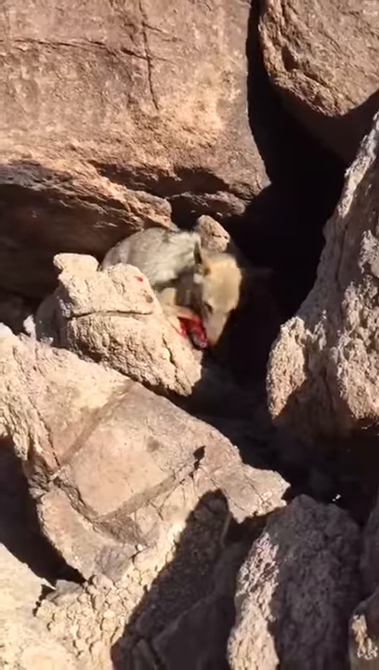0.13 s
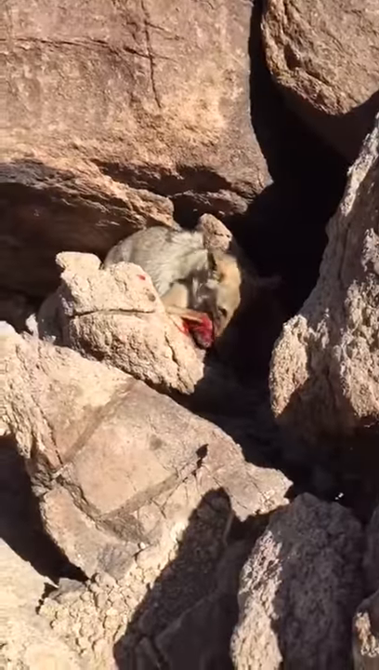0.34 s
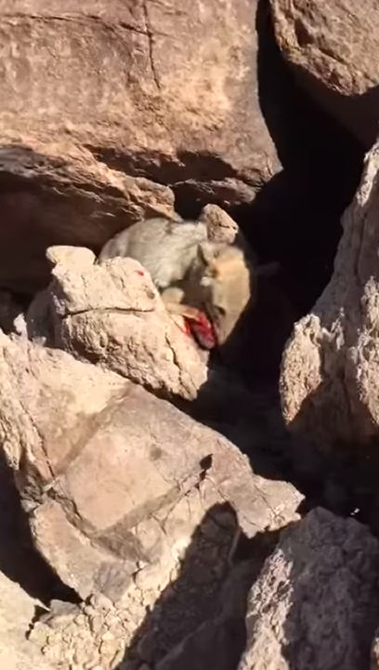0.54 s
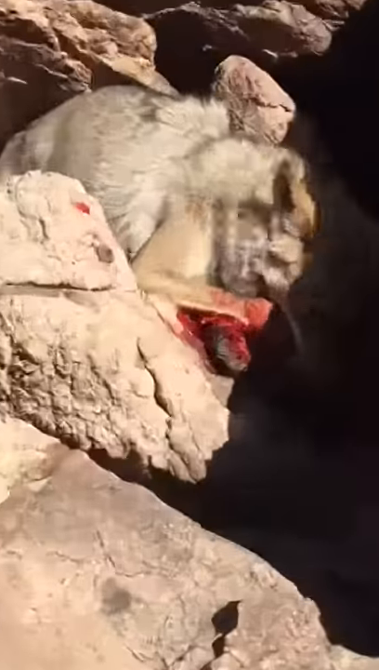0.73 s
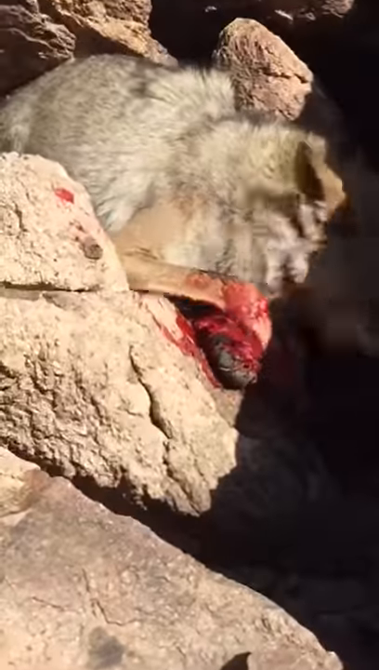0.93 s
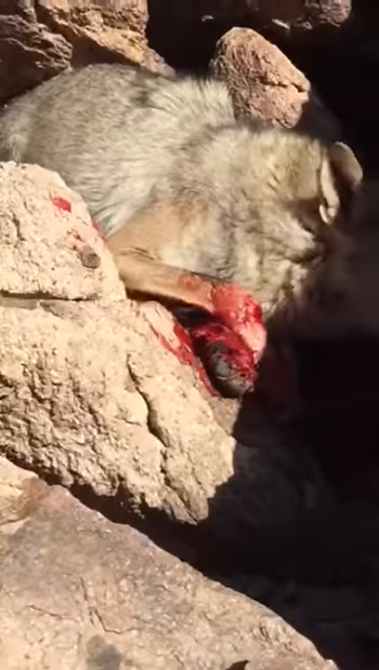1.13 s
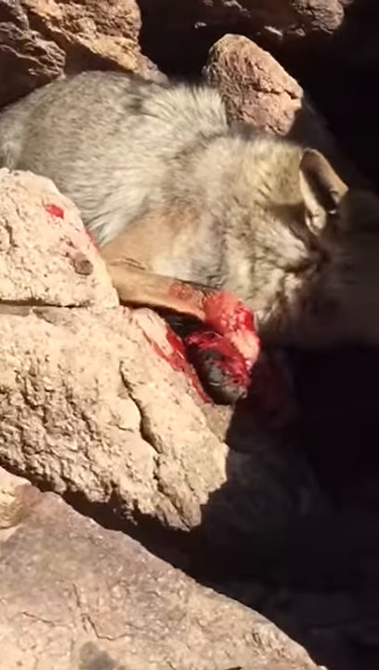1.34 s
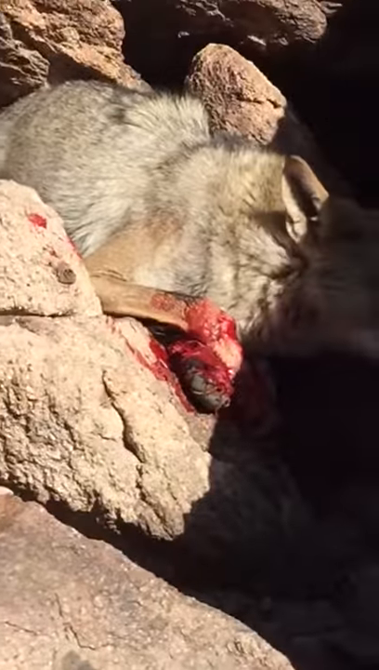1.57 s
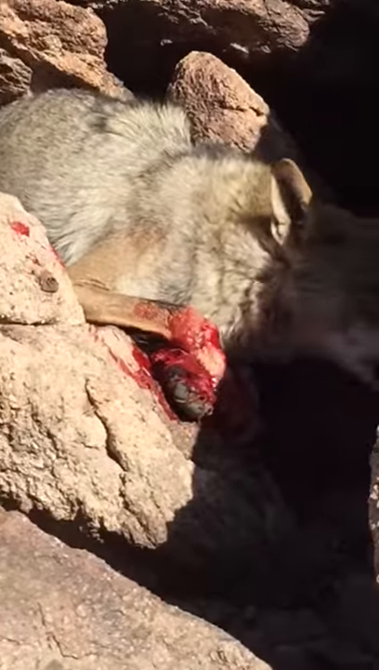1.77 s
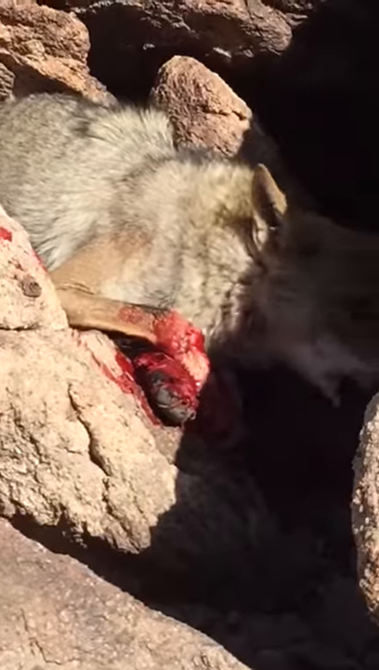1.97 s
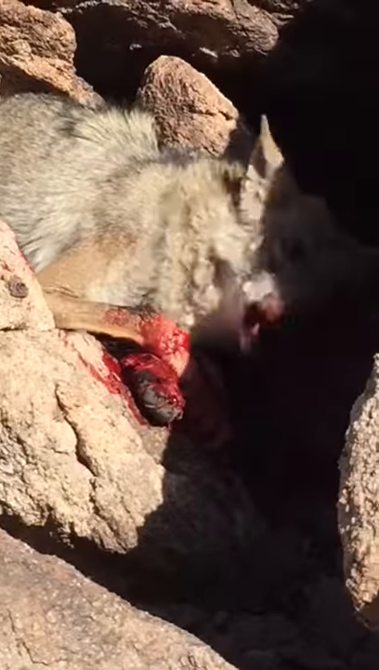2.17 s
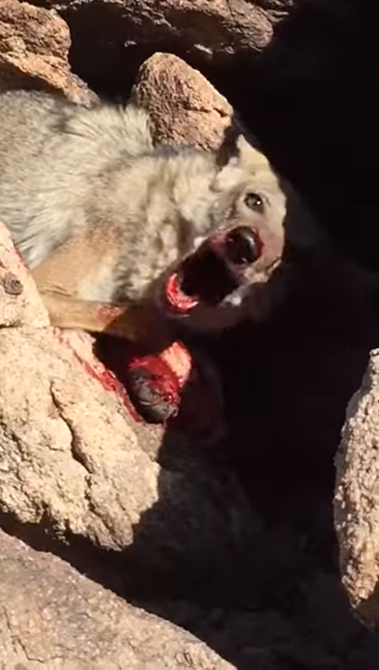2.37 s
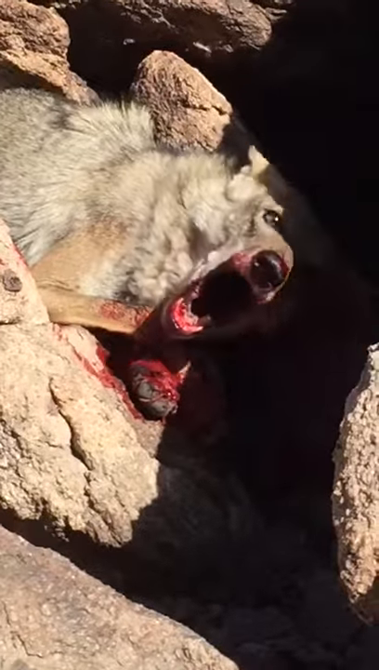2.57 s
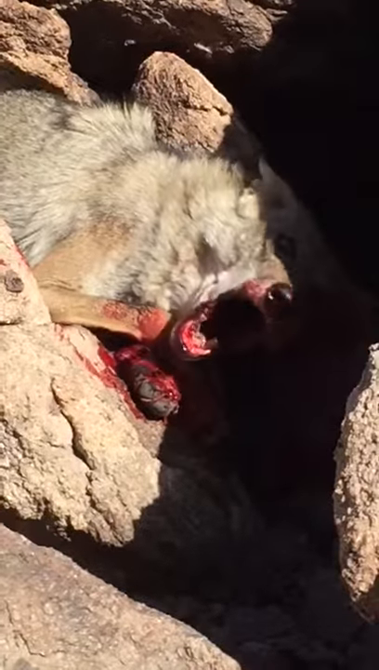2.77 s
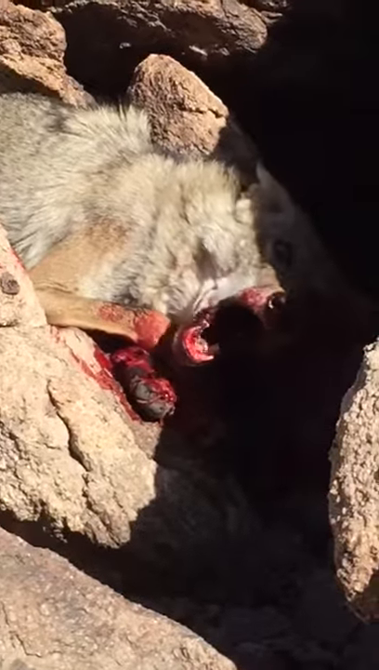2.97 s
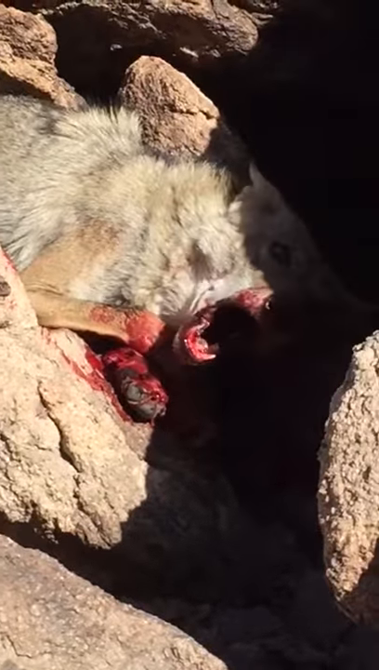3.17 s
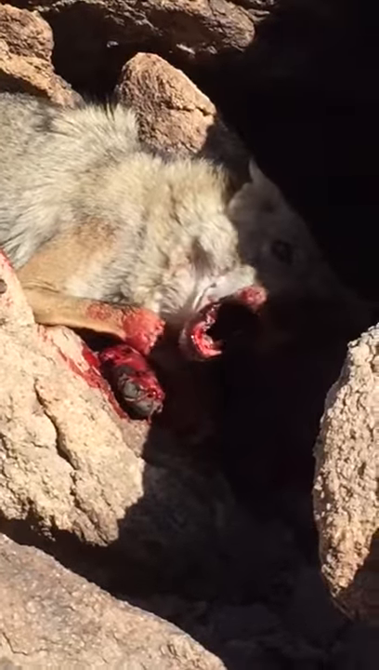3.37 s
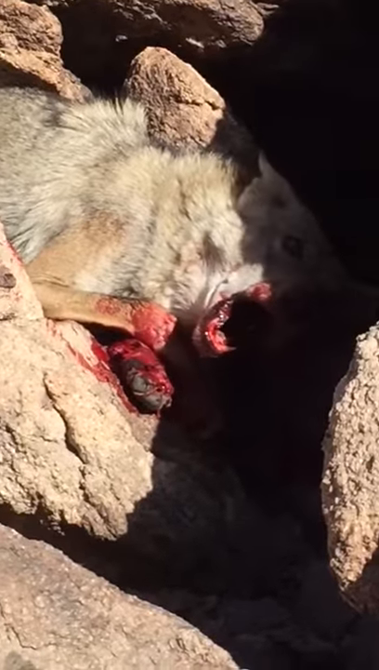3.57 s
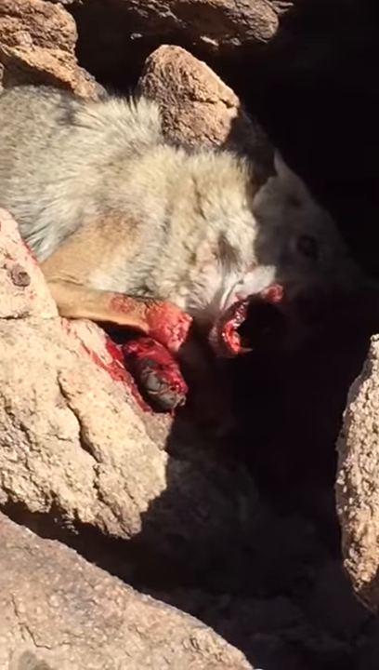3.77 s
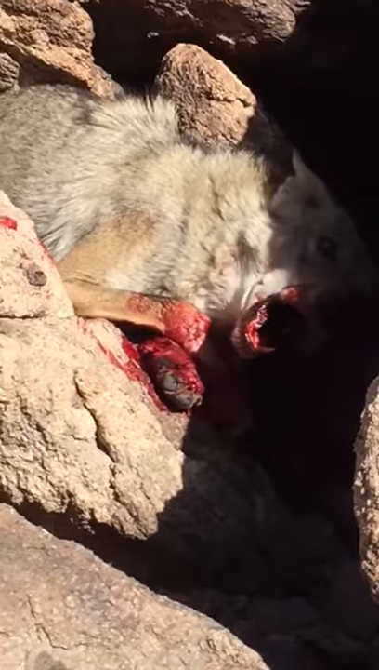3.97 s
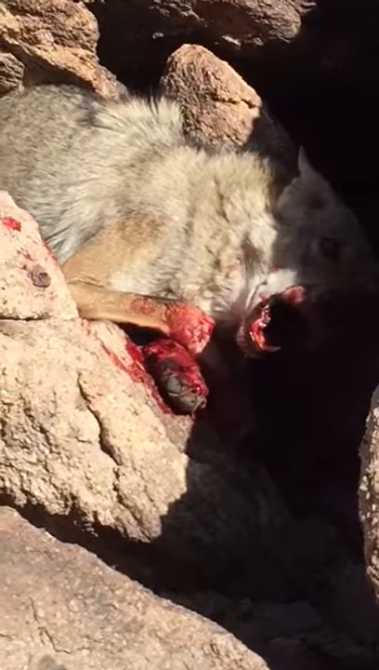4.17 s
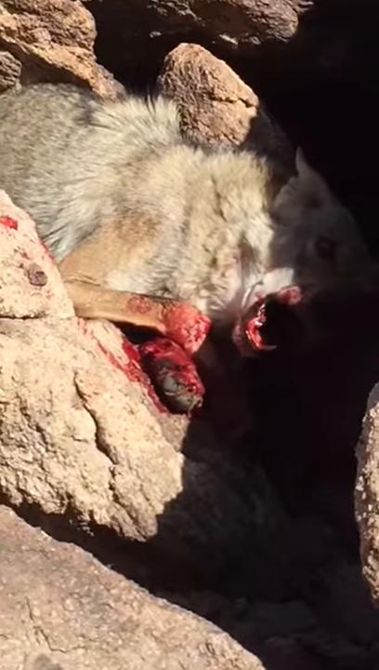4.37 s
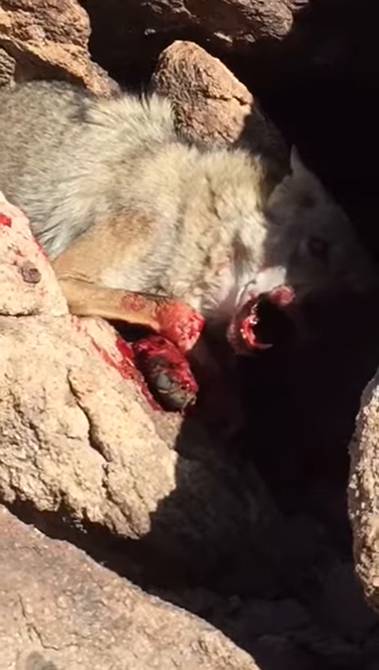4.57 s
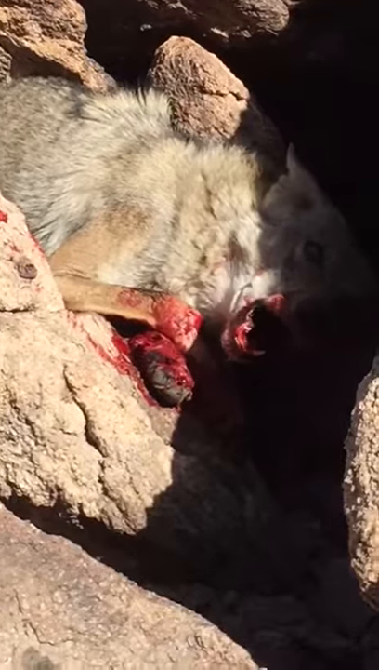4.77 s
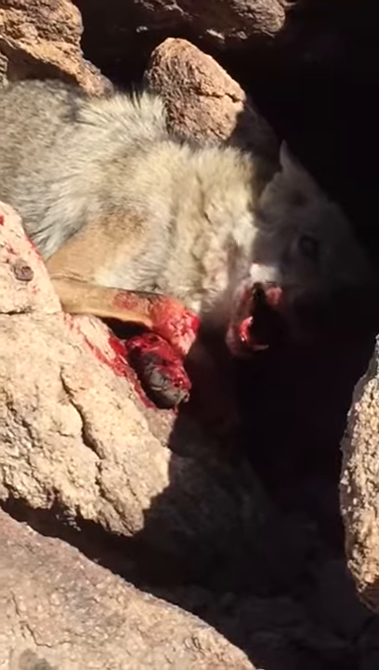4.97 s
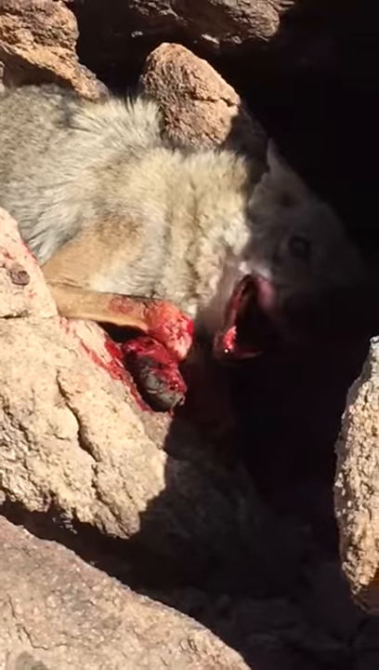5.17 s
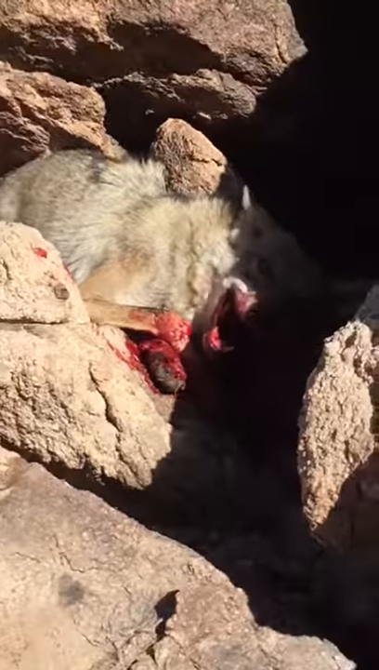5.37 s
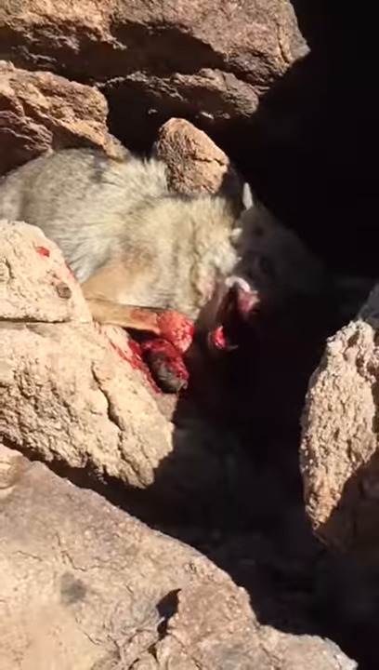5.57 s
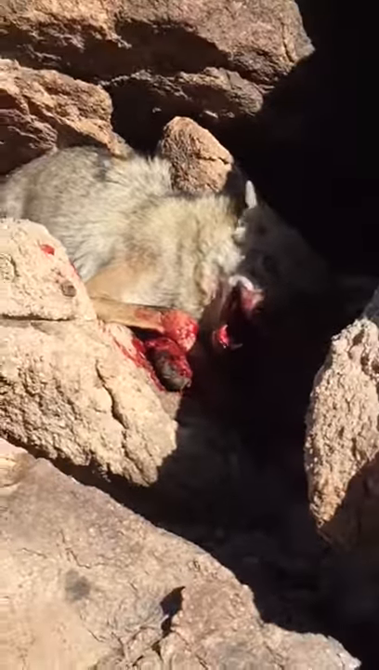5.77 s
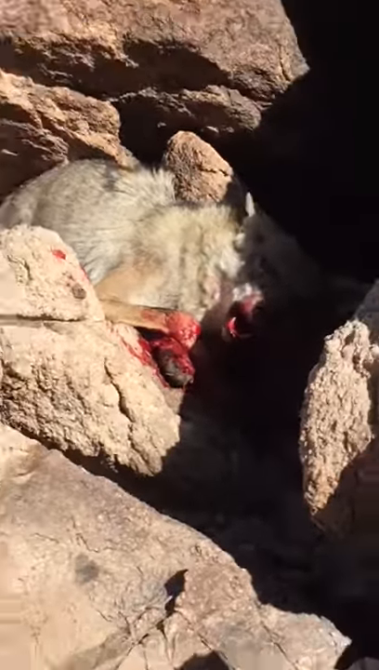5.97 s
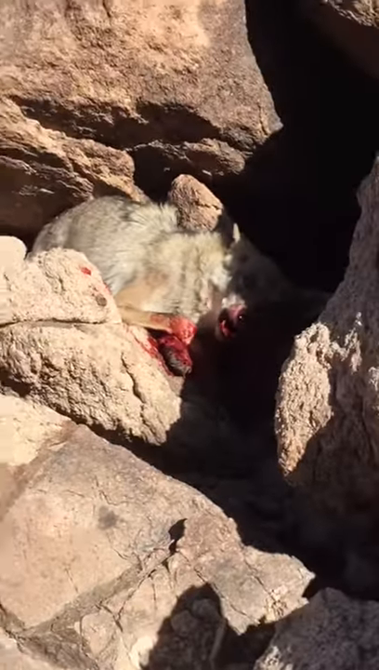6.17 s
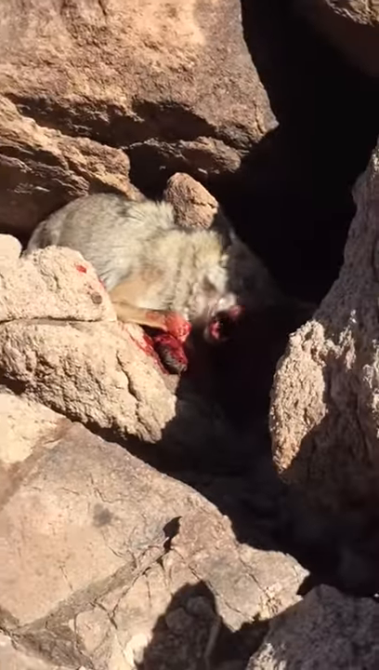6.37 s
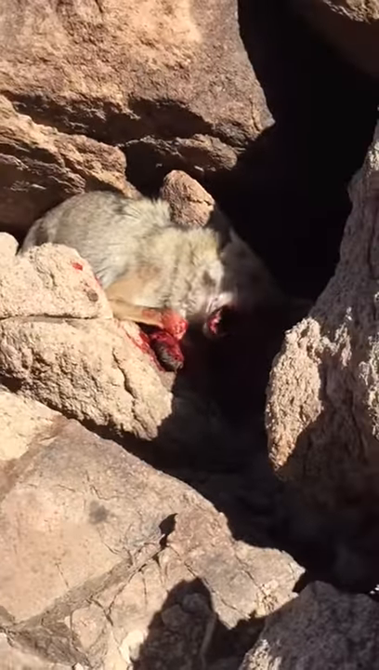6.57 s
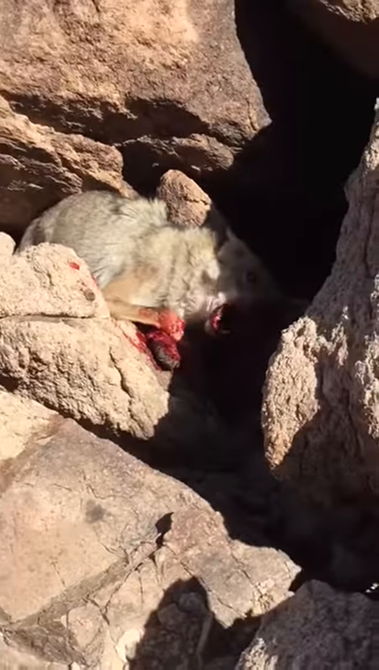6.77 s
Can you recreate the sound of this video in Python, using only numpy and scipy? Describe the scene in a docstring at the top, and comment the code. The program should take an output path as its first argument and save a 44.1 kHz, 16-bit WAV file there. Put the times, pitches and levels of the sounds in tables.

```python
"""Among rocks in light wind, a cornered wild canid growls, opens its jaws and breaks into a long howl that
cracks between registers and turns to hoarse groans and a short yelp; it growls again and rises to a scream.
Voices are gliding harmonics under fixed resonances, mixed with noise gated by the vocal folds.
Grit crunches in decaying noise bursts, damped sines knock dully, shaped noise makes wind and microphone
puffs, a wavering sine whines faintly in the distance, and a decaying noise echo stands for the rock faces."""
import sys
import numpy as np
from scipy import signal
from scipy.fft import rfft, irfft, next_fast_len
from scipy.io import wavfile
from scipy.ndimage import map_coordinates

SR = 44100
rng = np.random.default_rng(int(sys.argv[2]) if len(sys.argv) > 2 else 0)


def store_pcm(level_fs):
    """Save levels as 16-bit WAV."""
    pcm = np.round(np.clip(level_fs, -1, 1) * 32767).astype(np.int16)
    wavfile.write(sys.argv[1], SR, np.atleast_2d(pcm).T)


N = 300321

# air hiss past the teeth: (frequency [Hz], relative level [dB])
TEETH = [(2500, -31), (3800, -8), (5000, -3.5), (6300, 7.5), (7500, -7.5), (8700, 2), (9600, 2.5),
         (11000, -14)]
# throat resonances, jaws open: (frequency [Hz], relative level [dB])
OPEN_THROAT = [(100, -22), (240, -11.5), (380, -0.5), (510, 1), (650, -5), (800, -7.5), (980, 6.5),
               (1150, -20), (1400, -32), (2500, -83)]


def amp(db):
    """Decibels to gain."""
    return 10 ** (np.asarray(db) / 20)


def unit(x):
    """Scaled to rms 1."""
    return x / np.sqrt(np.mean(x ** 2) + 1e-20)


def along(points, hz):
    """(Hz, value) points read on a log frequency axis."""
    f, v = np.transpose(points)
    return np.interp(np.log(hz + 1), np.log(f + 1), v)


def curves(rows):
    """One value per sample for each column after the time."""
    s, *cols = np.transpose(rows)
    return [np.interp(np.arange(N) / SR, s, c) for c in cols]


def during(rows, fade_s):
    """1 over the time span of a table, fading to 0 at its ends."""
    t = np.arange(N) / SR
    return np.clip(np.minimum(t - rows[0][0], rows[-1][0] - t) / fade_s, 0, 1)


def phrases(tables, fade_s):
    """A gate that is open during each table's span, then the tables' joined curves."""
    gate = sum(during(rows, fade_s) for rows in tables)
    joined = [row for rows in tables for row in rows]
    return [gate] + curves(joined)


def bump(s, width_s):
    """A bell-shaped swell of height 1 around time s, down to 1/e at width_s from it."""
    return np.exp(-((np.arange(N) / SR - s) / width_s) ** 2)


def wobble(knots_per_s):
    """A smooth random curve through normally distributed knots."""
    knots = rng.standard_normal(int(N * knots_per_s / SR) + 4)
    return map_coordinates(knots, [np.arange(N) * knots_per_s / SR])


def filtered(x, gain):
    """x filtered by a gain that depends on frequency."""
    m = next_fast_len(N + 8192)
    return irfft(rfft(x, m) * gain(np.fft.rfftfreq(m, 1 / SR)), m)[:N]


def high_passed(x, cut_hz):
    """x with a steep fourth-power roll-off below cut_hz."""
    return filtered(x, lambda hz: hz ** 4 / np.hypot(hz ** 4, cut_hz ** 4))


def noise(spectrum, gate=1, shift=1):
    """Gated noise of rms 1, coloured by a spectrum whose frequencies are multiplied by shift."""
    steady = filtered(rng.standard_normal(N), lambda hz: amp(along(spectrum, hz)))
    position = np.cumsum(shift * np.ones(N)) % N
    return unit(gate * map_coordinates(steady, [position], mode="wrap"))


def turning(hz):
    """Phase of an oscillation in radians."""
    return 2 * np.pi * np.cumsum(hz) / SR


def overtones(pitch, phase, spectrum, order, count, shimmer=0):
    """Harmonics from the given order up, gliding under fixed resonances, each trembling on its own; rms near 1."""
    wave, power = np.zeros(N), np.zeros(N)
    coarse = pitch[::32]  # gains are updated every 32 samples
    for k in range(order, order + count):
        coarse_gain = amp(along(spectrum, k * coarse)) * (k * coarse < SR / 2)
        gain = np.repeat(coarse_gain, 32)[:N]
        knots = rng.standard_normal(N // 160 + 2)
        tremble = np.interp(np.arange(N), np.linspace(0, N, len(knots)), knots)
        wave += gain * (1 + shimmer * tremble) * np.sin(k * phase + rng.uniform(0, 2 * np.pi))
        power += gain ** 2 / 2
    return wave / np.sqrt(power * (1 + shimmer ** 2 / 2) + 1e-20)


def blend(tone, rasp, share):
    """Tone and rasp mixed at constant power."""
    share = np.clip(share, 0, 1)
    return np.sqrt(1 - share) * tone + np.sqrt(share) * rasp


def wind():
    """Quiet open air, with soft puffs rumbling on the microphone."""
    # air noise: (frequency [Hz], relative level [dB])
    air = [(15, -32), (25, 0), (91, -3), (168, -16), (351, -13), (501, -15.5), (752, -17.5), (9300, -29.5),
           (10800, -44), (14100, -73), (22000, -120)]
    # microphone rumble: (frequency [Hz], relative level [dB])
    buffet = [(20, -21.5), (45, 2.5), (75, 3), (120, -7.5), (200, -22.5), (500, -66.5)]
    # puffs of wind: (time [s], gain [dB], half length [s])
    puff_rows = [(0.35, -56, 0.061), (1.262, -39.5, 0.095), (2.086, -39.5, .035), (5.27, -39.5, 0.019),
                 (5.454, -46.5, 0.017), (5.932, -47, 0.013)]
    puffs = sum(amp(db) * bump(s, width_s) for s, db, width_s in puff_rows)
    restless = amp(-68 + 9 * wobble(14))
    return amp(-68) * noise(air) + (puffs + restless) * noise(buffet)


def whine():
    """A faint far tone, wavering in pitch and level, sags once; it shows when the animal is quiet."""
    # nominal glide: (time [s], pitch [Hz])
    glide = [(5.1, 513), (5.9, 502)]
    level_db = -79 + 2 * wobble(6)
    return amp(level_db) * np.sin(turning(curves(glide)[0] + 2 * wobble(32)))


def stones():
    """Grit crunches in decaying noise bursts; one dull knock is damped sines with a noise crack."""
    # grit noise: (frequency [Hz], relative level [dB])
    grit = [(200, -16), (700, 11), (1500, 6.5), (3000, 1), (5000, -10.5), (9500, -10.5), (11000, -25)]
    # gritty scuffs on the rock: (time [s], initial gain [dB], t60 [s])
    scuffs = [(0.161, -51, 0.013), (0.217, -49, 0.11), (0.251, -42, 0.099), (0.609, -57.5, 0.34),
              (0.693, -55, 0.078), (0.76, -53.5, 0.068), (4.653, -43, 0.04), (5.918, -66, 0.073)]
    # modes of the knock: (frequency [Hz], initial level [dB], t60 [s])
    knock_modes = [(81, -29, 0.11), (200, -29, 0.033), (489, -18.5, 0.01), (950, -22, 0.0071),
                   (1550, -43.5, 0.018)]
    knock_at_s = .622
    t = np.arange(N) / SR
    bursts = sum((t >= s) * amp(db - 60 * np.abs(t - s) / t60_s) for s, db, t60_s in scuffs)
    age = np.maximum(t - knock_at_s, 0)
    knock = sum(amp(db - 60 * age / t60_s) * np.sin(2 * np.pi * hz * age)
                for hz, db, t60_s in knock_modes)
    crack = (age > 0) * amp(-37.5 - 60 * age / 0.009)
    return knock + (bursts + crack) * noise(grit, amp(5.8 * wobble(700)))


def growl():
    """Slack folds flap unevenly; air rasps through throat, lips and teeth at each opening."""
    # low voice, nominal: two growls and, between them, the low undertone of the groans:
    #   (time [s], pitch [Hz], level [dB])
    low_voice = [
        [(.64, 89, -49), (.85, 103, -42.5), (1.27, 126, -40), (1.52, 109, -41.5), (1.76, 101, -42),
         (1.95, 108, -38.5), (2.23, 134, -34.5), (2.3, 149.6, -30), (2.36, 173.9, -48)],
        [(4.27, 150, -48), (4.38, 118, -48), (4.79, 112, -57)],
        [(5.98, 96, -48.5), (6.06, 107, -38), (6.18, 118, -37.5), (6.32, 118, -37), (6.42, 133, -31.5),
         (6.46, 155, -31)],
    ]
    # throat resonances, jaws closed: (frequency [Hz], relative level [dB])
    closed_throat = [(120, -38.5), (200, 2), (280, -7.5), (400, 5), (520, -4), (650, -11), (780, -2.5),
                     (900, -13.5), (1050, -33), (1300, -63), (2500, -76.5)]
    # air hiss past the lips: (frequency [Hz], relative level [dB])
    lip_spectrum = [(1200, -8), (1550, -30.5), (1730, 4.5), (1900, -13), (2350, -9), (2700, 3),
                    (2850, -2.5), (3100, -8), (4000, -30.5)]
    # the lips curl in a snarl: (time [s], half length [s], extra hiss [dB],
    #   lip frequency ratio [1], throat frequency ratio [1])
    snarls = [(0.668, .06, 27.5, 0.57, 0.81), (1.059, 0.098, 15, 0.81, 1.6), (5.99, .04, 15, .9, 1.1),
              (6.1, .12, 11.5, 1.07, 1.35)]
    ordinary_hz, ordinary_db = 124, -41.5
    lips_db, teeth_db, hiss_db_per_db = -71, -77, 1.6  # hiss of an ordinary growl, its growth with level
    teeth_share = .65  # part of a snarl's extra hiss dB that reaches the teeth
    gate, pitch, db = phrases(low_voice, fade_s=.035)
    octaves = np.log2(pitch / ordinary_hz)
    throat_db = -1.5 + 7.5 * octaves  # a higher growl moves from chest to throat
    hiss_db = hiss_db_per_db * (db - ordinary_db)
    lip_shift = 1 + 0.16 * octaves  # the lips draw back as the growl climbs, raising their resonances
    snarl_db, throat_shift = 0, 1
    for s, width_s, extra_db, lip_ratio, throat_ratio in snarls:
        curl = bump(s, width_s)
        snarl_db = snarl_db + extra_db * curl
        lip_shift = lip_shift + (lip_ratio - 1) * curl
        throat_shift = throat_shift + (throat_ratio - 1) * curl
    pitch = pitch * (1 + .012 * wobble(25) + .018 * wobble(130))
    phase = turning(pitch)
    opening = amp(5 * np.cos(phase) + 2 * wobble(70))
    chest = np.sqrt(2) * np.sin(phase) * amp(2.0 * wobble(55) - 2)
    tone = overtones(pitch, phase, closed_throat, order=2, count=8, shimmer=0.3)
    throat = blend(tone, noise(closed_throat, opening, throat_shift), share=.35)
    lips = amp(lips_db + hiss_db + snarl_db) * noise(lip_spectrum, opening, lip_shift)
    teeth = amp(teeth_db + hiss_db + teeth_share * snarl_db) * noise(TEETH, opening)
    return gate * (amp(db + 0.5) * chest + amp(db + throat_db) * throat + lips + teeth)


def hoarse(pitch, bright_db, rough):
    """The low voice through open jaws slides between clear pitch and a chaotic rattle."""
    # mouth resonances, jaws open: (frequency [Hz], relative level [dB])
    open_mouth = [(800, -56.5), (1200, -6), (1450, 2.5), (1850, 8.5), (2200, -13), (2600, -19),
                  (3100, -33.5), (3800, -28), (4300, -8), (5100, -21), (5800, -36.5), (6900, -23.5),
                  (8200, -31), (11000, -32)]
    pitch = pitch * (1 + (.0015 + .024 * rough) * wobble(220))
    phase = turning(pitch)
    alternation_db = 3.4 * rough * np.cos(phase / 2)  # every other cycle is stronger when hoarse
    opening = amp(3 * np.cos(phase) + alternation_db + 6 * wobble(120))
    tone = overtones(pitch, phase, OPEN_THROAT, order=1, count=7, shimmer=rough)
    buzz = overtones(pitch, phase, open_mouth, order=3, count=30, shimmer=.2 + .6 * rough)
    throat = blend(tone, noise(OPEN_THROAT, opening), .45 * rough ** 2)
    mouth = blend(buzz, noise(open_mouth, opening), .6 * rough ** 2)
    return throat + amp(bright_db - 13.5) * mouth


def rattle():
    """As the jaws open the voice swells, climbs and brightens, and air hisses past the teeth."""
    # rattles before a cry: (centre [s], half length of the swell [s], voice gain [dB],
    #   nominal pitch at the centre [Hz], teeth hiss gain [dB])
    rattles = [(2.374, 0.046, -15.5, 198, -41.5), (6.468, .08, -26.5, 183.4, -52)]
    octaves_per_s, bright_db_per_octave, hiss_lag_s = 7, 26.5, 0.025
    t = np.arange(N) / SR
    pitch = np.full(N, rattles[0][3], float)
    octaves, swell, hiss = 0, 0, 0
    for s, width_s, db, hz, hiss_db in rattles:
        near = np.abs(t - s) < .5
        climb = np.clip(octaves_per_s * (t - s), -.5, .5)
        pitch = np.where(near, hz * 2 ** climb, pitch)
        octaves = np.where(near, climb, octaves)
        swell = swell + amp(db) * bump(s, width_s)
        hiss = hiss + amp(hiss_db) * bump(s + hiss_lag_s, 1.6 * width_s)
    voice = swell * hoarse(pitch, bright_db_per_octave * octaves, rough=.55)
    # wide open jaws radiate little of the lowest tone
    return high_passed(voice, cut_hz=260) + hiss * noise(TEETH)


def registers(pitch):
    """Pitch and roughness of a cry that flips into falsetto and back, rasping at each flip."""
    # falsettos: (start [s], end [s], first pitch [Hz], last pitch [Hz],
    #   roughness [0-1], nominal warble [share of pitch])
    falsettos = [(2.688, 2.959, 747.6, 715, .03, 0), (3.012, 3.149, 739, 700.6, .04, .004),
                 (3.187, 3.455, 685.2, 690, 0, 0.021), (3.478, 3.499, 693, 686.5, .04, 0.01),
                 (3.52, 3.54, 688, 689, .04, 0.007), (6.642, 6.659, 709.3, 689.5, 0.4, 0),
                 (6.699, 6.739, 729, 713, 0.6, 0.005), (6.766, 6.84, 725, 735, 0.2, 0.015)]
    crack_s, crack_rough = .006, .08  # how fast the register flips, roughness of the flip
    strained_hz, clear_hz, strained_rough = 447.6, 487, .25  # a sagging cry grows strained
    linger_share, linger_s = 0.32, 0.039  # share of a falsetto's roughness spread around it, how far
    warble_hz = 21.8
    t = np.arange(N) / SR
    rough = np.interp(pitch, [strained_hz, clear_hz], [strained_rough, 0])
    stray = .35 * wobble(14)  # wander of the warble's phase and depth
    for start, end, first_hz, last_hz, strain, warble in falsettos:
        up = (np.tanh((t - start) / crack_s) - np.tanh((t - end) / crack_s)) / 2
        swing = np.sin(2 * np.pi * (warble_hz * (t - start) + stray))
        glide = np.interp(t, [start, end], [first_hz, last_hz])
        high = glide * (1 + warble * (1 + 2 * stray) * swing)
        pitch = pitch + up * (high - pitch)
        cracks = crack_rough * (bump(start, 2 * crack_s) + bump(end, 2 * crack_s))
        around = linger_share * strain * bump((start + end) / 2, linger_s)
        rough = rough + up * strain + (1 - up) * (cracks + around)
    return pitch, np.clip(rough, 0, 1)


def carried_db(hz):
    """How strongly throat and rock niche pass a harmonic."""
    # throat response to a cry: (frequency [Hz], gain [dB])
    howl_throat = [(350, 8.5), (470, 2), (740, -1), (1000, 0.5), (1200, -12.5), (1430, -7), (1800, -13.5),
                   (2200, -20.5)]
    # rock faces reinforce or cancel narrow bands: (frequency [Hz], half width [Hz], gain [dB])
    niche = [(508, 12, -10), (537.4, 18, 5.5), (575.8, 9.3, -14.5), (613, 24, -1), (654.3, 23, -6.5),
             (1270, 31, -12), (1578, 72, -10), (2056, 108, -10.5)]
    rock_db = sum(db * np.exp(-((hz - centre) / width) ** 2) for centre, width, db in niche)
    return along(howl_throat, hz) + rock_db


def howl():
    """Taut folds sing an almost pure note; under strain it quavers and a slower flutter beats against it."""
    # one curve per cry (howl, yelp, scream), lower register: (time [s], pitch [Hz], nominal level [dB])
    cries = [
        [(2.385, 455.3, -21), (2.418, 537.9, -14), (2.485, 538.4, -16), (2.585, 578.4, -22.5), (2.65, 584, -16),
         (2.685, 606, -19), (2.99, 610.2, -19), (3.17, 631.6, -20), (3.615, 639, -21), (3.72, 583, -21),
         (3.79, 553.4, -20.5), (3.94, 545.9, -22.5), (4.06, 505.7, -23), (4.095, 434.7, -31.5)],
        [(4.755, 345.8, -44.5), (4.79, 475.8, -24), (4.815, 498, -26.5), (4.885, 469, -23.5), (4.91, 455, -29)],
        [(6.43, 325.4, -37), (6.505, 469.2, -18), (6.55, 508.2, -14), (6.61, 531.2, -17), (6.64, 572.2, -19),
         (6.675, 563, -18.5), (6.71, 567, -17.5), (6.85, 582, -15.5)],
    ]
    # mouth resonances of a cry: (frequency [Hz], relative level [dB])
    howl_mouth = [(1400, -0.5), (2300, 4), (2600, -6), (2950, -13), (3500, -15.5), (4150, -11.5), (4950, 5),
                  (5600, -6), (6500, -4.5), (7400, -13.5), (8600, -13.5), (11000, -27)]
    # air jet noise: (frequency [Hz], relative level [dB])
    turbulence = [(350, -39.5), (650, -5), (1000, 17), (1300, -1), (1750, 16), (2400, -2.5), (3200, -26),
                  (4200, -12), (5000, -9.5), (5700, -14.5), (6700, 1), (8500, -2.5), (11000, -38.5)]
    # the head turns aside: (time [s], facing the microphone [0-1])
    head_turn = [(2.6, 0.91), (2.8, 0)]
    # change of the first three harmonics while it faces the microphone: one gain each [dB]
    facing_db = (1, -11.5, 3)
    ordinary_db, ordinary_upper_db, upper_db_per_db = -20, -41.5, 1.51  # upper overtones grow faster
    singing, pitch, db = phrases(cries, fade_s=0.01)
    pitch, rough = registers(pitch)
    facing, = curves(head_turn)
    low_db = [db + carried_db(k * pitch) + facing * turn_db + .8 * wobble(30)
              for k, turn_db in enumerate(facing_db, 1)]
    upper_db = ordinary_upper_db + upper_db_per_db * (db - ordinary_db) + 3.5 * facing
    quaver = 0.041 * np.minimum(rough, .1) * wobble(60)
    jitter = .0024 * wobble(600)  # fast unevenness hazes the highest overtones
    flutter = turning(165 + 40 * wobble(110))
    phase = turning(pitch * (1 + quaver + jitter))
    phase = phase + rough * (.6 * wobble(450) + .5 * np.sin(flutter))
    low = sum(np.sqrt(2) * amp(level_db) * np.sin(k * phase) for k, level_db in enumerate(low_db, 1))
    shimmer = .45 + 4 * np.minimum(rough, .15)
    upper = amp(upper_db - 2.5) * overtones(pitch, phase, howl_mouth, order=4, count=20, shimmer=shimmer)
    # the air jet hisses once a cycle, more when the voice is strained
    jet = amp(upper_db - 7.5 + 14.5 * rough) * noise(turbulence, amp(2 * np.cos(phase)))
    # flutter swells the note as it raises the pitch, which puts a rough side tone above each harmonic
    swell = 1 + rough * (.9 * np.cos(flutter) + .75 * wobble(600))
    rasp = amp(db - 6) * rough * noise(OPEN_THROAT, amp(4 * np.cos(flutter)), shift=pitch / 450)
    voice = singing * ((low + upper) * swell / np.sqrt(1 + rough ** 2) + jet + rasp)
    return high_passed(voice, cut_hz=310)


def groan():
    """The groans sink, climb again and sink unsteadily; the lower the pitch, the more rattle."""
    # groan curves, nominal: (time [s], pitch [Hz], level [dB], brightness [dB])
    groans = [
        [(4.068, 448, -32.5, 10), (4.125, 316, -20.5, -2.5), (4.155, 295, -33, 4), (4.187, 264, -23, 0.5),
         (4.215, 247, -22.5, -2.5), (4.26, 246, -26.5, 5.5), (4.32, 218, -31, -3), (4.37, 187.4, -41, -2),
         (4.44, 181, -36.5, -2)],
        [(4.441, 200, -40.5, -8), (4.52, 301.5, -31.5, 4.5), (4.587, 260.4, -25, 9), (4.63, 240, -30, 1),
         (4.69, 200.7, -36.5, -6), (4.775, 183.8, -35.5, 8.5)],
        [(4.885, 345, -26.5, -5), (4.93, 293.3, -29.5, 0.5), (4.97, 256, -27, 6.5), (5, 232, -27.5, 3),
         (5.025, 213, -44.5, 9), (5.06, 200, -61, -5)],
    ]
    # roughness when rattling, then when clear [0-1]
    rough_ends = (.8, .2)
    chaos_hz, clear_hz = 187.3, 249.4
    gate, pitch, db, bright_db = phrases(groans, fade_s=.004)
    rough = np.interp(pitch, [chaos_hz, clear_hz], rough_ends)
    level = amp(db + 2 * wobble(55))
    return gate * level * hoarse(pitch * (1 + .008 * wobble(45)), bright_db, rough)


def crevice(x, t60_s):
    """Close rock faces scatter a short echo, so gliding overtones fade in and out."""
    t = np.arange(SR // 3) / SR
    tail = rng.standard_normal(len(t)) * amp(-60 * t / t60_s) * (t > .001)
    echo = signal.fftconvolve(x, tail / np.linalg.norm(tail))[:N]
    return filtered(echo, lambda hz: amp(along([(600, -19), (1600, -15), (4000, -6)], hz)))


def scene():
    """The animal and the stones in their rock niche, under light wind and a far whine."""
    near = stones() + growl() + rattle() + howl() + groan()
    return (wind() + whine() + near + crevice(near, t60_s=.05))[None]


def record(dry):
    """The recorder keeps nothing above its band limit."""
    top_hz = 10950
    return filtered(dry[0], lambda hz: hz < top_hz)[None]


dry = scene()
out = record(dry)
store_pcm(out)
```